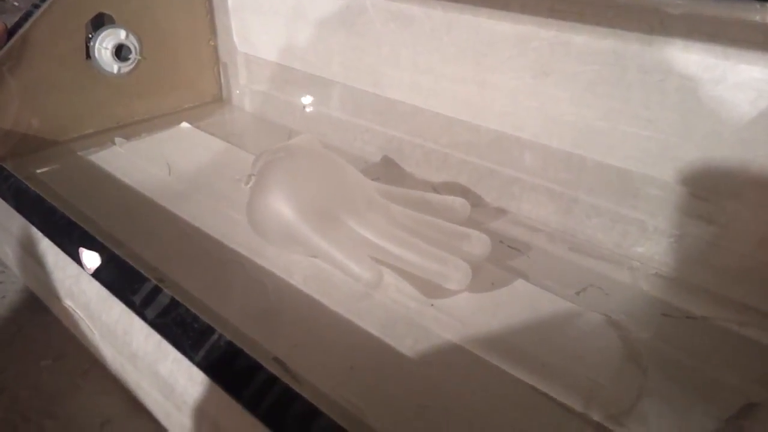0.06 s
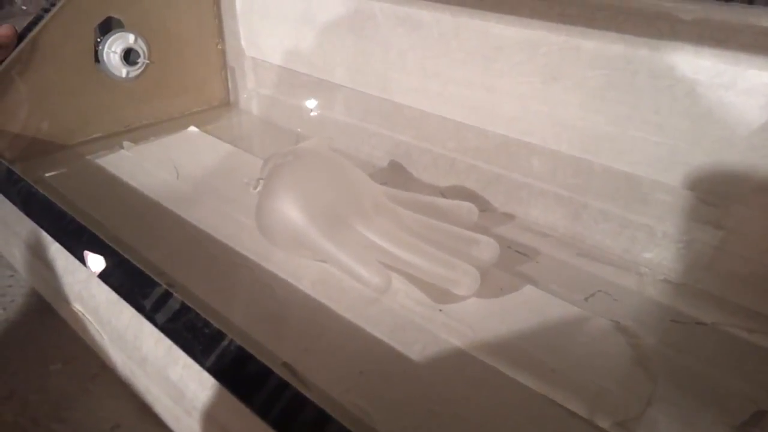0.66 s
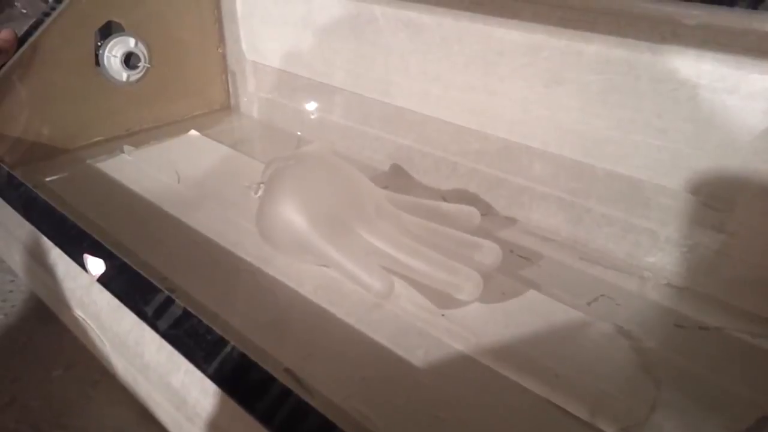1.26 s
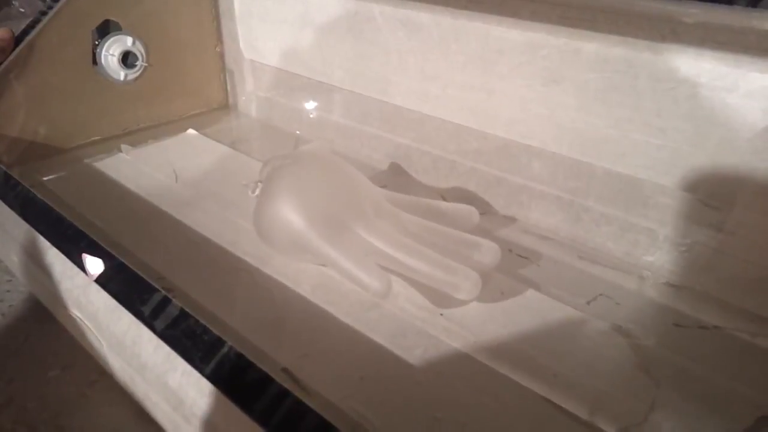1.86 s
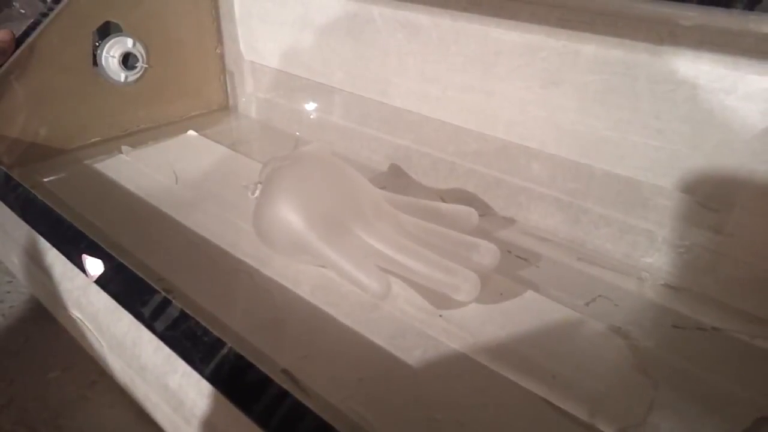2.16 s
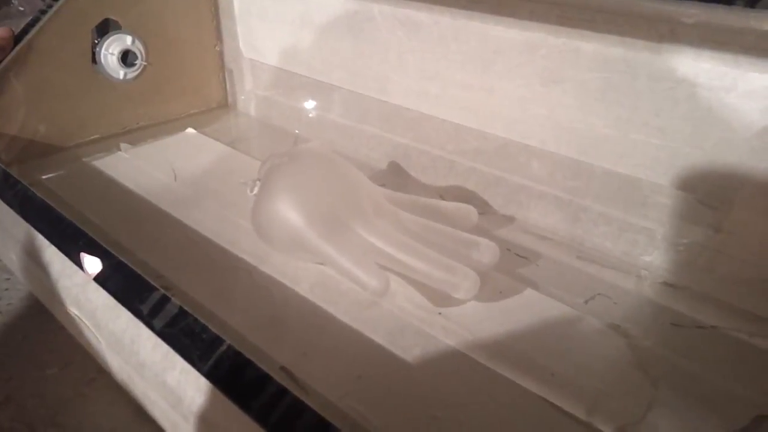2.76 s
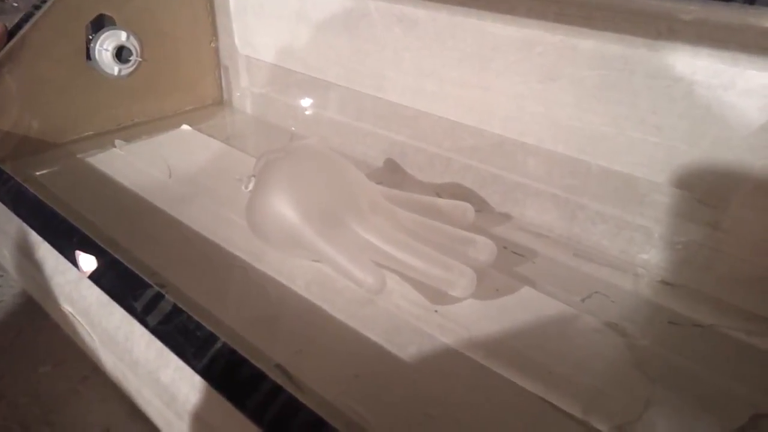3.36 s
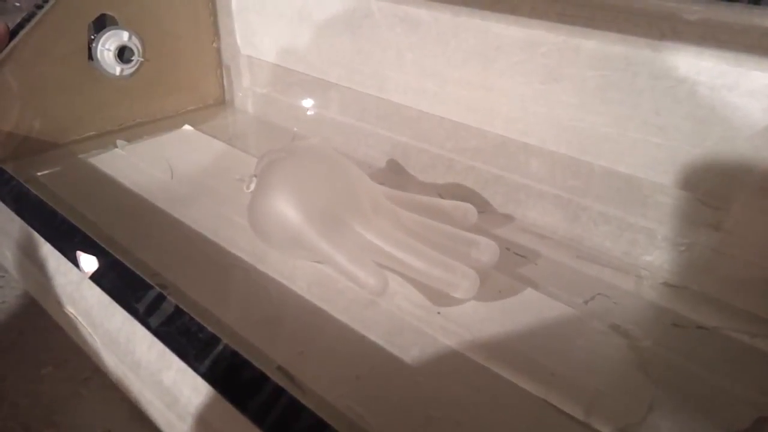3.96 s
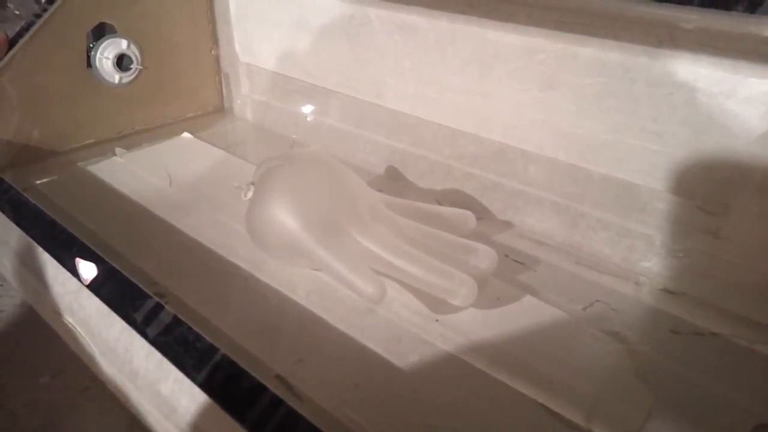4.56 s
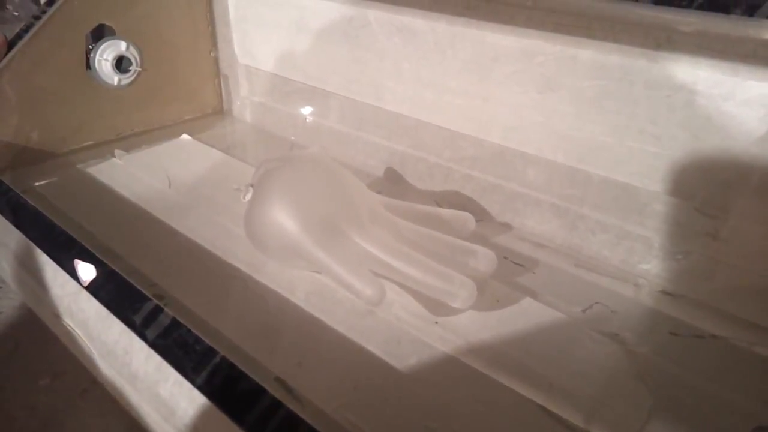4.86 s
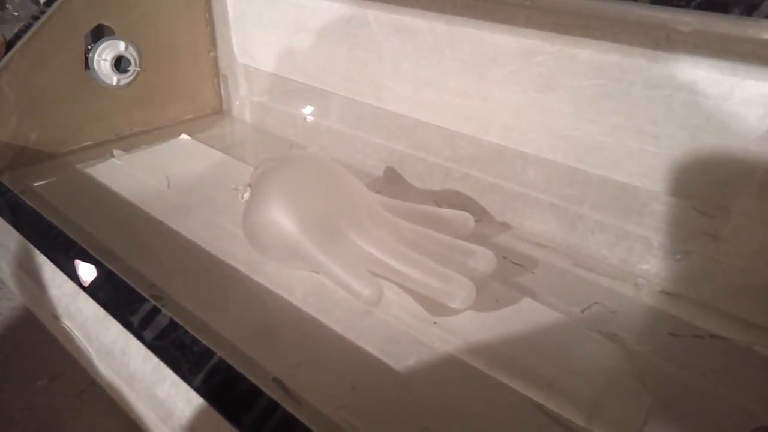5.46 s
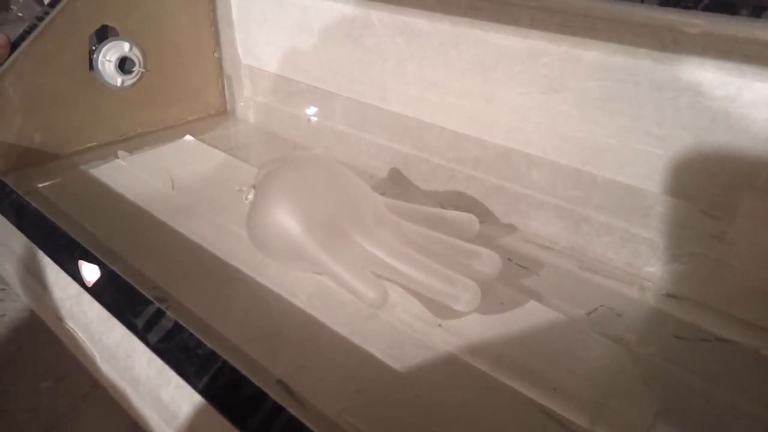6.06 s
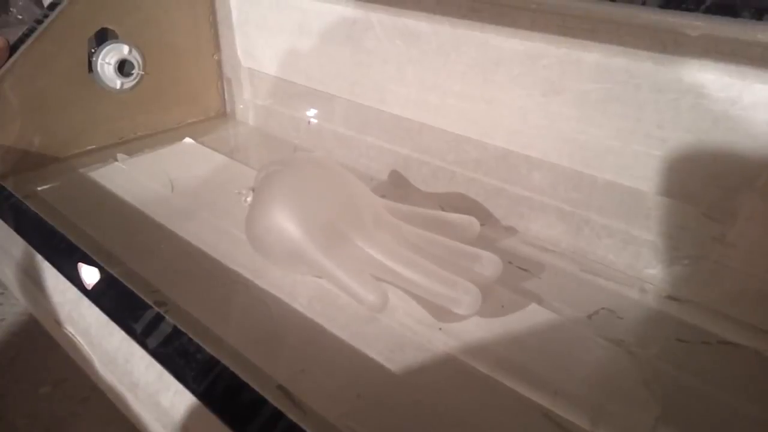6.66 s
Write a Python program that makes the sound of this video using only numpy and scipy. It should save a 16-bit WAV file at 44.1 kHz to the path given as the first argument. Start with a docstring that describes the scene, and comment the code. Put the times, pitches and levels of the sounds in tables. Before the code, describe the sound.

A vacuum pump runs steadily close by with a low hum, a fast even clatter and soft gulps from its exhaust.

```python
"""Rotary vacuum pump

An oil-sealed pump empties a chamber close by, its shaft turning 28 times a second. The motor hums
on harmonics of the mains, two strokes a turn throb, and the casing whines. Contacts that recur each
turn excite resonances, heard as knocks, chirps and clatter, over a rumble of cooling air. Soft low
gulps, probably at the exhaust flap, come on about every third stroke and pause for a while midway."""
import sys
import numpy as np
from scipy import signal
from scipy.fft import rfft, irfft, next_fast_len
from scipy.io import wavfile
from scipy.ndimage import uniform_filter1d, map_coordinates

SR = 44100
rng = np.random.default_rng(int(sys.argv[2]) if len(sys.argv) > 2 else 0)


def digitize_waveform(pressure):
    """Quantize a signal to 16-bit integers and store it at the path in sys.argv[1].

    Rows of a 2-D input are taken as channels; values are limited to [-1, 1].
    """
    field = np.atleast_2d(pressure).T
    bounded = np.clip(field, -1, 1)
    quanta = np.round(bounded * 32767).astype(np.int16)
    wavfile.write(sys.argv[1], SR, quanta)


N = 295911
MAINS_HZ, START_TURN = 60.015, -.061
EARS = np.array([[.5], [-.5]])  # shares of a left-minus-right level or phase

# Shaft speed, sagging slightly. Each row: time in seconds, turns per second.
SHAFT_SPEED = [(0.0, 28.005), (1.0, 28.001), (2.0, 27.985), (3.0, 27.968), (4.0, 27.958), (5.0, 27.956),
               (6.0, 27.941), (6.7, 27.893)]
# Motor hum. Each row: multiple of the mains, level in dB, left minus right in dB, left lead in radians.
HUM_PARTIALS = [(2, -24.5, -6, 0.69), (3, -62, -4, 0.12), (4, -19.5, 0.5, 0.22), (6, -53.5, 5, 0),
                (8, -48.5, 8.5, 0.11)]
# Stroke throb and casing whine. Each row: multiple of the shaft speed (rounded when used),
# level in dB, left minus right in dB, left lead in radians.
STROKE_PARTIALS = [(2, -23.5, 0, 0.13), (3, -49, 5, 0), (4, -30.5, 0.5, 0.21), (5, -50, 1, 0),
                   (6, -31, 0, 0.22), (8, -33.5, 2, 0.23), (10, -32.5, 2, 0.27), (12, -44, 2, -0.028),
                   (14, -46.5, -1, 1.1), (22, -45, 2.5, -0.13)]
WHINE_PARTIALS = [(50, -30, -3, -2), (52, -52, 9, -2.5), (53, -37, 5.5, 2.5), (54, -25, 1, 3),
                  (64.36, -42, -0.5, 0.5), (65.9, -35.5, -1, 2.6), (73, -35, 11.5, 2),
                  (75.75, -38.5, -7, -2), (86.1, -33.5, 0.5, 0.7), (96.2, -33, 9.5, 3.1),
                  (100.08, -32.5, 1, -0.2), (101.4, -32.5, 10, 3.5), (117.24, -38.5, 20.5, 0.4),
                  (120.84, -38, -8, 2), (139, -42.5, -1, 1), (163.3, -37.5, -1, -1.7),
                  (202, -35, 8.5, 1.53), (220, -45.5, 8, -2)]
# Contacts within one turn. Each row: shaft angle in turns, relative level in dB, decay in turns.
JOLT_CONTACTS = [(.94, -1.5, 0.37), (.48, -4.5, 0.31)]
KNOCK_CONTACTS = [(.87, -6.5, 0.042), (0.99, -8.5, 0.042), (.14, -14.5, 0.052), (.45, -18.5, 0.11)]
VANE_CONTACTS = [(.89, -4, .05), (.03, 2.5, 0.068), (.11, -1, 0.099), (.25, -4.5, 0.1), (.6, -2.5, 0.091)]
RATTLE_CONTACTS = [(.885, -1.5, 0.022), (.935, -2, 0.037), (.995, 1, 0.031), (.1, -9, 0.17),
                   (.45, -9.5, 0.11), (.66, -9, 0.027)]
# Resonances of the pump's parts. Each row: frequency in Hz, bandwidth in Hz, relative level in dB.
BASE_MODES = [(430, 130, -9), (616, 92, 3)]
CASING_MODES = [(392, 136, -22.5), (617, 47, -29), (803.6, 74, -10.5), (926, 49, -5.5), (1037, 44, -6.5),
                (1118, 98, -22), (1278, 45, -16.5), (1426, 80, -24.5), (1580, 90, -28.5), (1817, 170, -20),
                (2038, 58, -16.5)]
COVER_MODES = [(2160, 220, -18), (2334, 39, -5.5), (2406, 35, -3), (2498, 89, -7.5), (2579, 74, -8),
               (2684, 51, -9), (2806, 23, -9.5), (3015, 96, -18), (3160, 22, -10.5), (3297, 35, -10.5)]
FITTING_MODES = [(3610, 140, -12), (3839, 94, -5.5), (4396, 56, -2.5), (4568, 48, 1), (4800, 260, -2),
                 (5340, 92, -8), (5674, 59, -6.5), (6030, 215, -7.5), (6870, 580, -15), (7130, 600, -13.5),
                 (8100, 660, -13.5)]
# Noise spectra. Each row: frequency in Hz, relative spectral density in dB.
HISS_SPECTRUM = [(300, -5.5), (700, -2.5), (1500, 3), (3000, -4.5), (5000, 1), (7200, 2), (8200, -4),
                 (9200, -11), (9900, -4), (10400, -17.5), (11000, -50)]
RUMBLE_SPECTRUM = [(15, -11), (36, 2.5), (52, -12), (80, 2.5), (130, 0.5), (165, -3), (205, -1),
                   (245, -4.5), (330, -16), (600, -20), (1500, -51)]
# Spread between the ears. Each row: frequency in Hz, side minus mid in dB.
STEREO_WIDTH = [(100, -19), (300, -6), (930, -9), (1150, 3.5), (1420, -0.5), (1800, -11), (2150, -4),
                (2400, -4.5), (3300, -4.5), (4200, 2.5), (4850, -2), (5300, -0.5), (9000, 0.5)]
# Ringing parts: the knock, its tail in the casing, its rebound, two valve chirps, the cover, a light
# tap, a metallic ping. Each row: angle in turns, first and final pitch in Hz, rise and decay in seconds,
# level in dB, swing with the torque in dB, left minus right in dB, left lead in radians.
RINGING_PARTS = [(.90, 997, 930, 0.0014, 0.0022, -17.5, 0, -2.5, .5),
                 (.91, 928, 930, 0.0024, 0.024, -18.5, 4, 2, 0.55),
                 (0.216, 1000, 1000, .002, 0.0093, -20, 2.5, -2, .7),
                 (.93, 2698, 2586, 0.0022, 0.0019, -2.5, -1, 8, 1.3),
                 (.10, 2880, 2400, 0.0016, 0.0028, -6.5, -1.2, 10.5, 1.45),
                 (.17, 2460, 2392, 0.0046, .012, -9, 0.5, -3, 1.08),
                 (.66, 3300, 3313, .0015, 0.003, -22, 5, 12, 1.1),
                 (.90, 4980, 4850, 0.0022, .0028, -6.5, 2.5, 1, 1.2)]
# Exhaust gulps. Each row: time in seconds, relative level in dB.
EXHAUST_GULPS = [(0.0676, -19), (0.12, -19), (0.1737, -18), (0.2272, -14), (0.2641, -14), (0.3164, -14),
                 (0.3528, -17.5), (0.4059, -20), (0.4594, -14), (0.5125, -21), (0.5855, -20), (0.62, -18),
                 (0.6565, -16), (0.7102, -19), (0.7635, -13), (0.8166, -20), (0.8696, -13), (0.9058, -19),
                 (0.9769, -17), (1.0314, -16), (1.0838, -13), (1.1376, -17), (1.1925, -13), (1.281, -26),
                 (1.3345, -17), (1.3875, -18), (1.4415, -13), (1.4782, -17), (1.5317, -13), (1.5853, -16),
                 (1.6206, -18), (1.693, -16), (1.7455, -9), (1.798, -17), (1.8519, -18), (1.9052, -17),
                 (1.9426, -19), (2.0496, -14), (2.1224, -22), (2.1567, -12), (2.2644, -14), (2.3714, -17),
                 (2.4075, -20), (2.4601, -19), (2.5141, -15.5), (2.6213, -14), (2.6746, -14.5),
                 (2.7286, -15), (2.8008, -19), (2.837, -15), (4.6247, -18), (4.679, -16), (4.7313, -16),
                 (4.8594, -22), (4.8935, -18), (4.9469, -14.5), (5.053, -12), (5.107, -20), (5.1617, -19),
                 (5.216, -17), (5.268, -17), (5.322, -18), (5.377, -18), (5.429, -15), (5.502, -16.5),
                 (5.5889, -22), (5.6444, -21), (5.7172, -17), (5.7512, -16), (5.8047, -17), (5.86, -19),
                 (5.9122, -16), (5.9664, -20), (6.0215, -18), (6.0932, -12), (6.1467, -17), (6.2005, -17),
                 (6.2875, -17), (6.362, -23), (6.3959, -19), (6.4692, -18), (6.577, -19), (6.6304, -21),
                 (6.6626, -21)]


def amp(db):
    """Amplitude ratio of a level in decibels."""
    return 10 ** (np.asarray(db) / 20)


def unit_rms(x):
    """Normalisation to unit mean power."""
    return x / np.sqrt(np.mean(x ** 2) + 1e-20)


def along(points, hz):
    """Interpolation of (Hz, value) points on a logarithmic frequency axis."""
    knots_hz, values = np.transpose(points)
    return np.interp(np.log(hz + 1), np.log(knots_hz + 1), values)


def wobble(rate):
    """Smooth random modulation: a spline through `rate` knots a second."""
    return map_coordinates(rng.standard_normal(int(N * rate / SR) + 4), [np.arange(N) * rate / SR])


def filtered(x, response):
    """Linear filtering: the spectrum is multiplied by a frequency response."""
    size = next_fast_len(N + SR // 4)
    return irfft(rfft(x, size) * response(np.fft.rfftfreq(size, 1 / SR)), size)[..., :N]


def resonances(modes):
    """Modal superposition: a body responds as a sum of damped oscillators of alternating sign."""
    return lambda hz: sum((-1) ** k * amp(db) * 1j * hz * width / (centre**2 - hz**2 + 1j * hz * width)
                          for k, (centre, width, db) in enumerate(modes))


def radiate(drives, response, pan_db):
    """Source and filter: two drives through one body give the mid and side of a sound of rms 1."""
    mid, side = filtered(drives, lambda hz: response(hz) * amp([0 * hz, along(STEREO_WIDTH, hz)]))
    return unit_rms(np.array([mid + side, mid - side]) * amp(pan_db * EARS))


def force(contacts, turn, floor_db):
    """Incoherent sources add in power: contacts set in at their angles and decay, over steady rubbing."""
    power = sum(amp(2 * db) * np.exp(-2 * ((turn - angle) % 1) / decay) for angle, db, decay in contacts)
    return unit_rms(np.sqrt(power + amp(2 * floor_db)))


def scrape(contacts, turn, floor_db, fresh_db, size=1576):
    """Periodic friction: the same surfaces meet each turn, so a texture repeats under fresh grit."""
    grip = force(contacts, np.arange(size) / size, floor_db)
    texture = grip * rng.standard_normal((2, size))
    for _ in range(6):  # a hard contact drives all harmonics about equally
        flat = irfft(np.exp(1j * np.angle(rfft(texture))), size)
        local_power = np.abs(uniform_filter1d(flat ** 2, size=60, mode="wrap"))
        texture = grip * flat / np.sqrt(local_power + 1e-12)
    repeated = np.array([map_coordinates(row, [turn % 1 * size], mode="grid-wrap") for row in texture])
    grit = force(contacts, turn, floor_db) * rng.standard_normal((2, N))
    return unit_rms(repeated) + amp(fresh_db) * grit


def harmonics(partials, cycles, waver_db):
    """Fourier series of a periodic motion; each harmonic has its own level and phase at each ear."""
    return np.sqrt(2) * sum(amp(db + pan_db * EARS + waver_db * wobble(9))
                            * np.sin(2 * np.pi * round(multiple) * cycles + lead * EARS)
                            for multiple, db, pan_db, lead in partials)


def motor_hum(mains, turn):
    """Amplitude modulation: the magnetic hum swells with the load of each pumping stroke."""
    load = 1 + 0.13 * np.cos(4 * np.pi * (turn - .03))
    return load * harmonics(HUM_PARTIALS, mains - .055, waver_db=0.5)


def stroke_throb(turn):
    """Periodic pumping: two strokes a turn favour the even harmonics of the shaft."""
    return harmonics(STROKE_PARTIALS, turn + 0.097, waver_db=0.2)


def casing_whine(turn):
    """Forced vibration: the casing whines on high shaft harmonics, renewed by each jolt."""
    jolts = force(JOLT_CONTACTS, turn, floor_db=-9)
    return jolts * harmonics(WHINE_PARTIALS, turn + .095, waver_db=0.5)


def base_buzz(turn):
    """Resonance: the jolts make the base buzz faintly on the middle harmonics of the shaft."""
    jolts = scrape(JOLT_CONTACTS, turn, floor_db=-18, fresh_db=-15)
    return amp(-47.5) * radiate(jolts, resonances(BASE_MODES), pan_db=-5)


def mechanism_clatter(mains, turn):
    """Beating: torque ripple against the shaft rocks the strength of knocks, vane taps, rattle and hiss."""
    ripple = np.cos(4 * np.pi * mains)
    knock_turn = turn + 0.0016 * ripple + 0.00017 * wobble(28)
    vane_turn = turn + 0.00057 * ripple
    effort = amp(0.45 * ripple + 0.17 * wobble(28))
    hardening = np.linspace(-.5, .5, N)  # the clatter hardens as the chamber empties
    knocking = scrape(KNOCK_CONTACTS, knock_turn, floor_db=-25.5, fresh_db=-11)
    tapping = scrape(VANE_CONTACTS, vane_turn, floor_db=-13.5, fresh_db=-2)
    rattling = scrape(RATTLE_CONTACTS, vane_turn, floor_db=-13.5, fresh_db=0.5)
    air = force(RATTLE_CONTACTS, turn, floor_db=-6.5) * rng.standard_normal((2, N))
    casing = amp(-27.5) * radiate(knocking, resonances(CASING_MODES), pan_db=-1)
    cover = amp(-23) * radiate(tapping, resonances(COVER_MODES), pan_db=4.5)
    fittings = amp(-24.5 + 2.4 * hardening) * radiate(rattling, resonances(FITTING_MODES), pan_db=1)
    hiss = amp(-24 + hardening) * radiate(air, lambda hz: amp(along(HISS_SPECTRUM, hz)), pan_db=4.5)
    return effort * (casing + cover + fittings + hiss)


def ringing_parts(t, turn, glide_s=0.0039, scatter_db=1.05, jitter_s=2e-5, sway_s=3e-5, lag_rad=0.47):
    """Damped free vibration: parts ring once a turn; torque ripple rocks their strength and timing."""
    out = np.zeros((2, N))
    for angle, first_hz, final_hz, rise_s, decay_s, db, swing_db, pan_db, lead in RINGING_PARTS:
        starts = np.interp(np.arange(np.floor(turn[-1])) + angle % 1, turn, t)
        offset_s = ((angle + .5) % 1 - .5) / SHAFT_SPEED[0][1]  # from the nearest whole turn
        for start, (strength, slip) in zip(starts, rng.standard_normal((len(starts), 2))):
            torque_phase = 4 * np.pi * MAINS_HZ * (start - offset_s) - lag_rad
            span = slice(int(start * SR), int(start * SR) + SR // 14)
            age = np.maximum(t[span] - start - sway_s * np.sin(torque_phase) - jitter_s * slip, 0)
            cycles = final_hz * age + (first_hz - final_hz) * glide_s * (1 - np.exp(-age / glide_s))
            envelope = (1 - np.exp(-(age / rise_s) ** 2)) * np.exp(-age / decay_s)
            gain = amp(db + swing_db * np.cos(torque_phase) + scatter_db * strength + pan_db * EARS)
            out[:, span] += gain * envelope * np.sin(2 * np.pi * cycles + lead * EARS)
    return out


def air_rumble():
    """Flow noise: the cooling air gives a random pressure, strongest at low frequencies."""
    noise = rng.standard_normal((2, N))
    return amp(-30) * radiate(noise, lambda hz: amp(along(RUMBLE_SPECTRUM, hz)), pan_db=2.5)


def exhaust_gulps(pulse_hz=127, pulse_s=0.0073, ring_hz=158, ring_t60_s=0.2, ring_db=-8.5):
    """Impulse response: each lift of the flap is a dip of pressure, then the oil box rings briefly."""
    t = np.arange(-SR // 40, SR // 8) / SR
    pulse = -np.cos(2 * np.pi * pulse_hz * t) * np.exp(-(t / pulse_s) ** 2)
    envelope = amp(ring_db - 60 * t / ring_t60_s) * np.clip(t / 0.0097, 0, 1)
    ring = envelope * np.cos(2 * np.pi * ring_hz * (t - .003))
    lifts = np.zeros(N)
    for time_s, db in EXHAUST_GULPS:
        lifts[round(time_s * SR)] = amp(db)
    centre = np.argmin(np.abs(t))
    return amp(-1) * signal.fftconvolve(lifts, pulse + ring)[centre:centre + N]


def scene():
    """Superposition: the pressures of the pump's sources and its cooling air add at each ear."""
    t = np.arange(N) / SR
    turn = START_TURN + np.cumsum(np.interp(t, *np.transpose(SHAFT_SPEED))) / SR
    mains = MAINS_HZ * t  # phase in cycles
    drone = motor_hum(mains, turn) + stroke_throb(turn) + casing_whine(turn) + base_buzz(turn)
    clatter = mechanism_clatter(mains, turn) + ringing_parts(t, turn)
    return drone + clatter + air_rumble() + exhaust_gulps()


def record(dry):
    """Soft saturation rounds off the highest peaks, and a band limit removes the top treble."""
    ceiling, top_hz = .96, 10650
    rounded = dry / (1 + np.abs(dry / ceiling) ** 10) ** (1 / 10)
    return filtered(rounded, lambda hz: hz < top_hz)


dry = scene()
out = record(dry)
digitize_waveform(out)
```